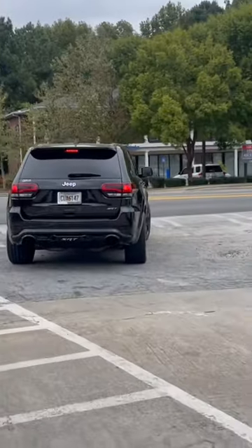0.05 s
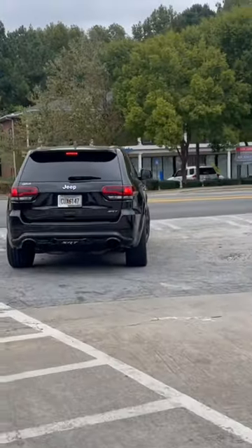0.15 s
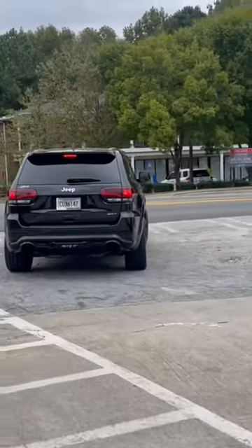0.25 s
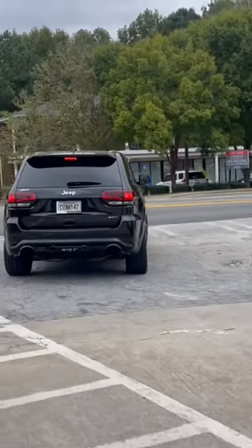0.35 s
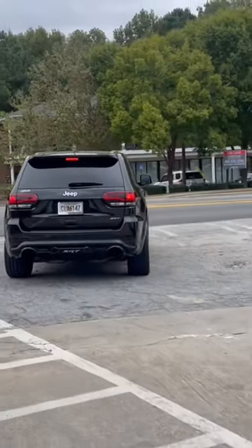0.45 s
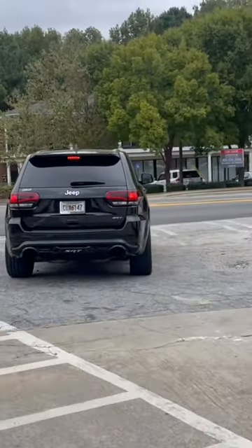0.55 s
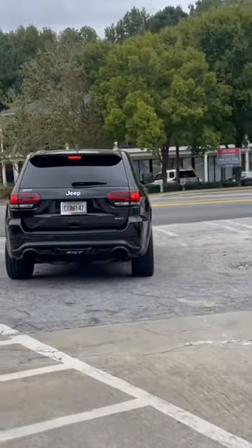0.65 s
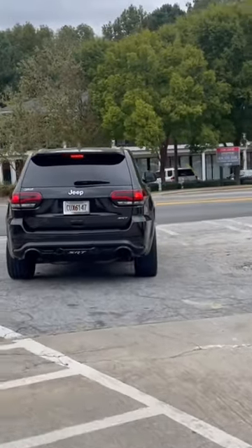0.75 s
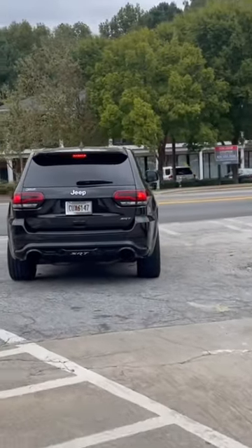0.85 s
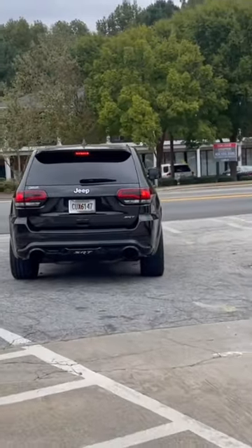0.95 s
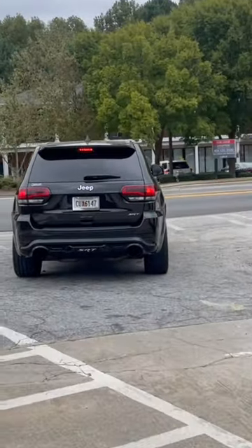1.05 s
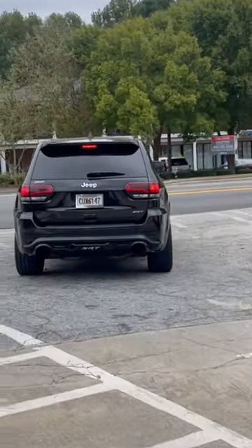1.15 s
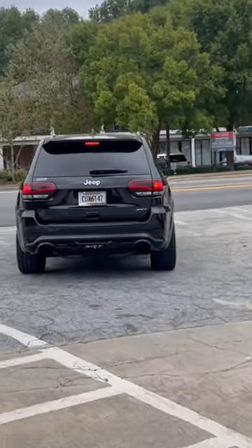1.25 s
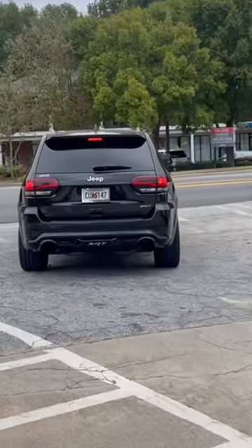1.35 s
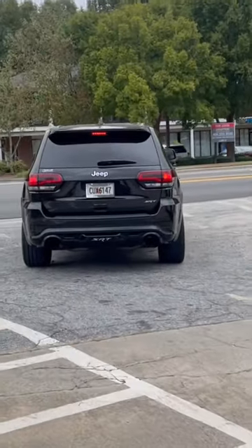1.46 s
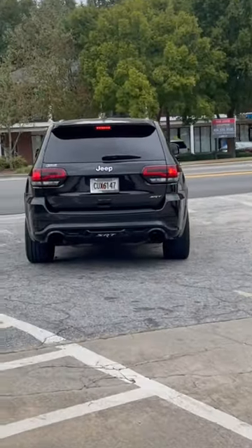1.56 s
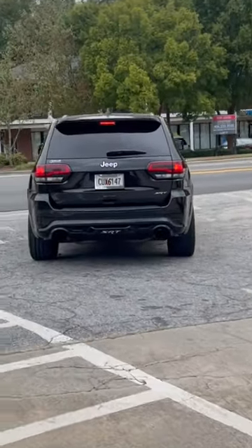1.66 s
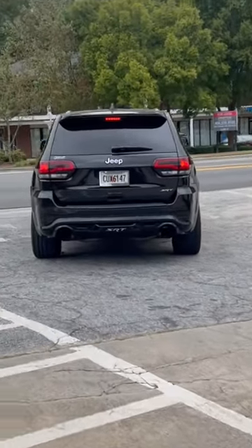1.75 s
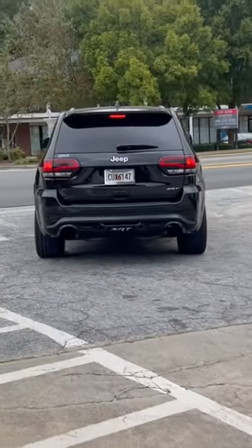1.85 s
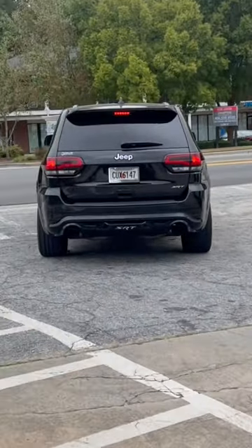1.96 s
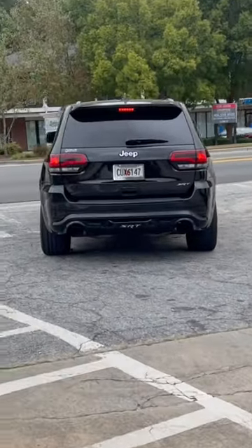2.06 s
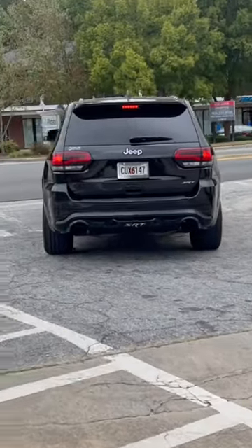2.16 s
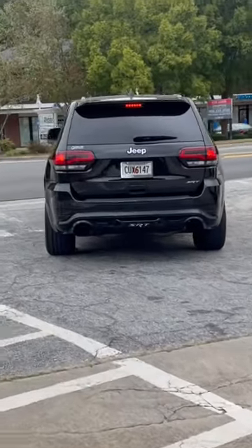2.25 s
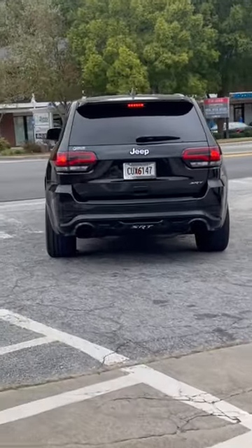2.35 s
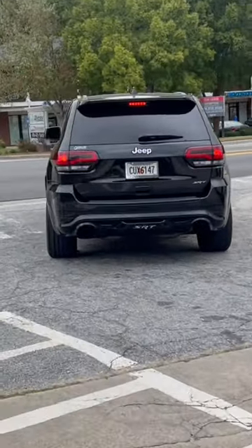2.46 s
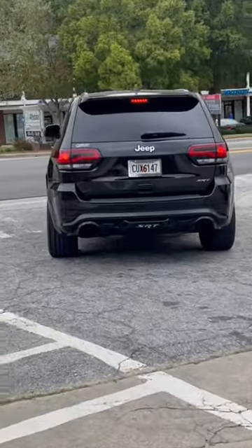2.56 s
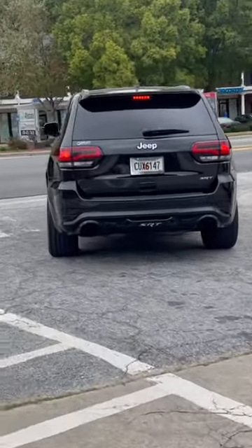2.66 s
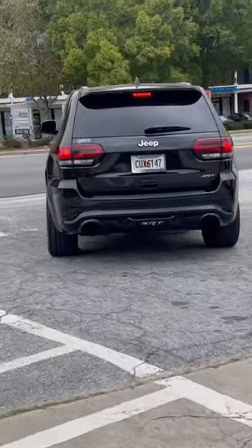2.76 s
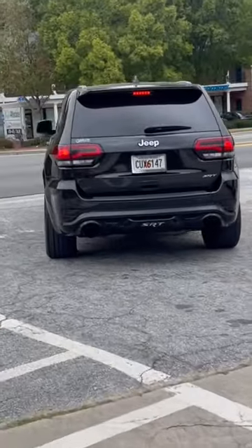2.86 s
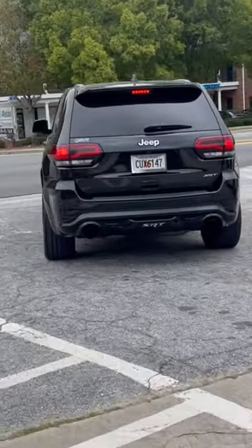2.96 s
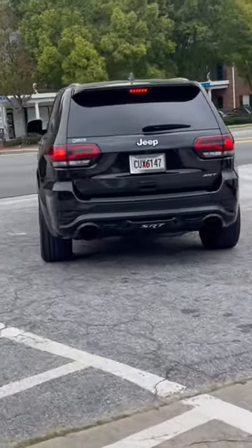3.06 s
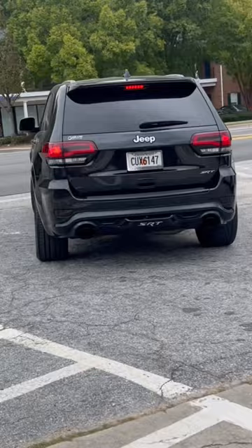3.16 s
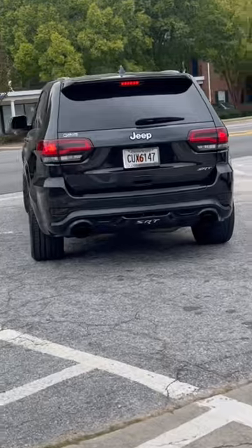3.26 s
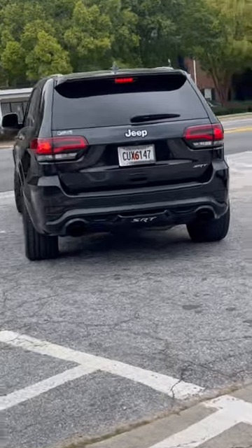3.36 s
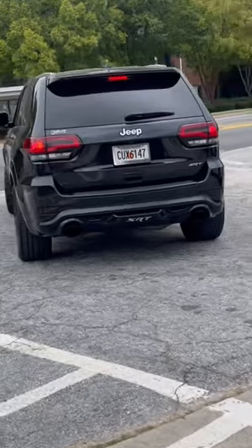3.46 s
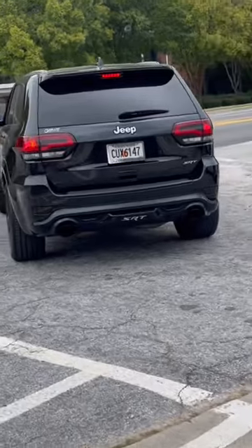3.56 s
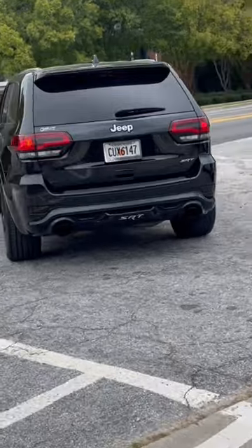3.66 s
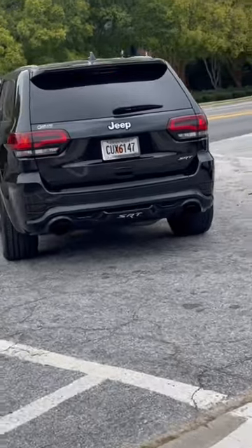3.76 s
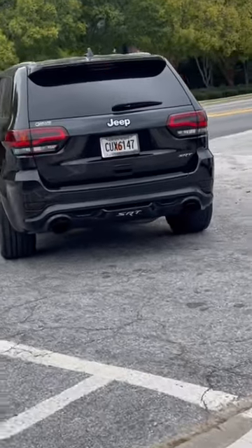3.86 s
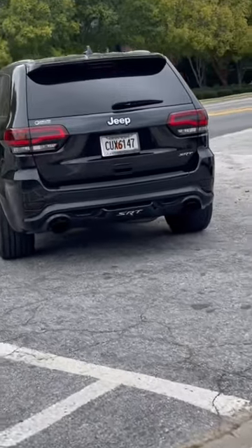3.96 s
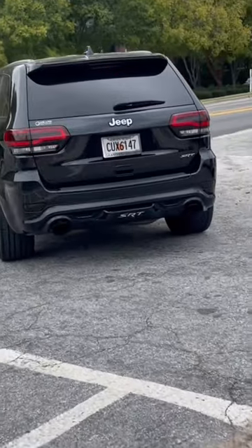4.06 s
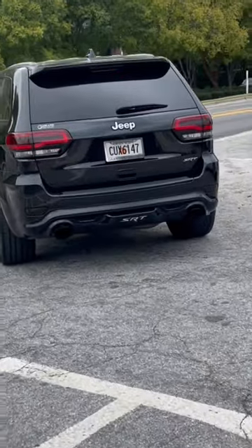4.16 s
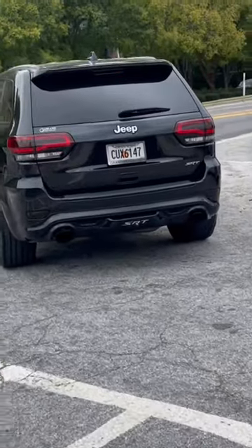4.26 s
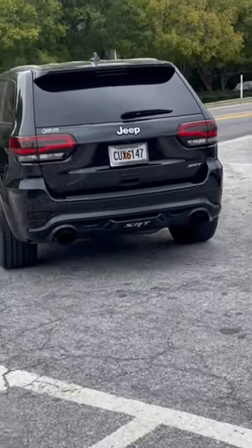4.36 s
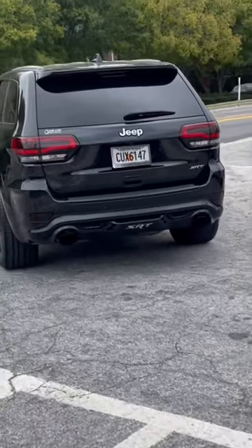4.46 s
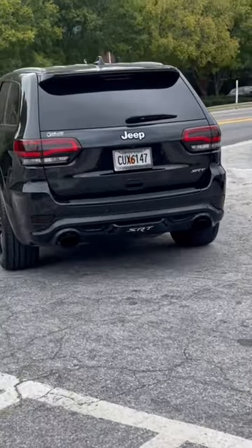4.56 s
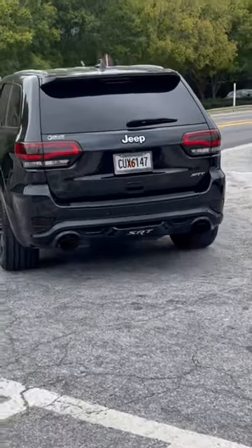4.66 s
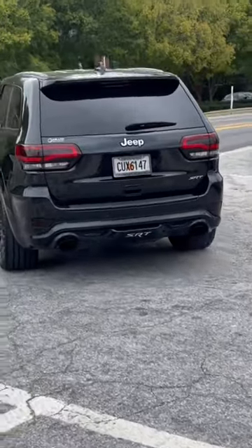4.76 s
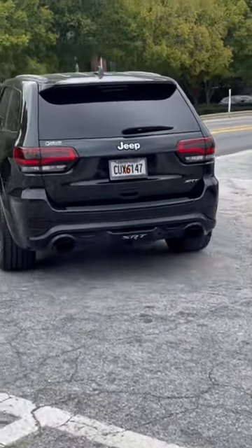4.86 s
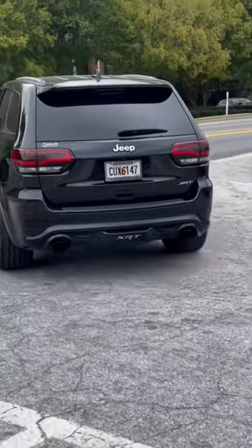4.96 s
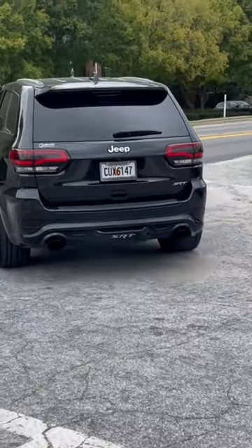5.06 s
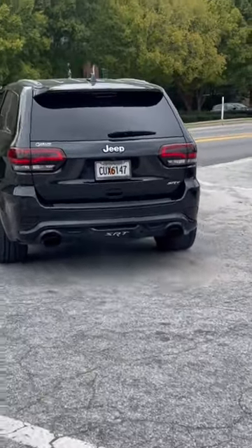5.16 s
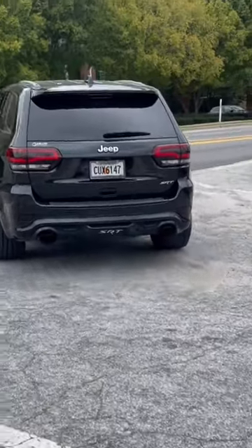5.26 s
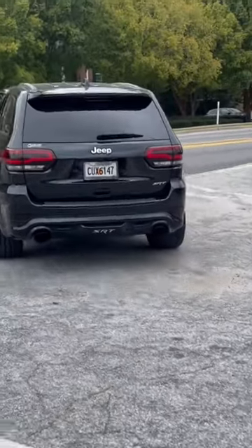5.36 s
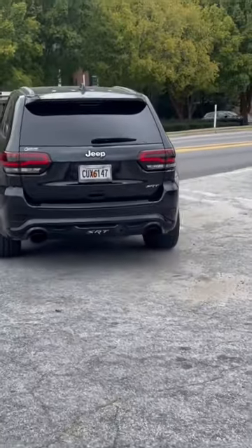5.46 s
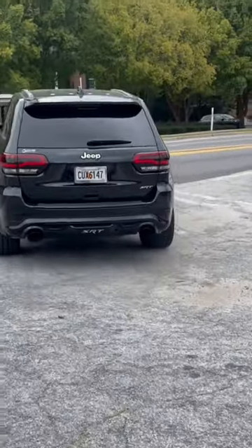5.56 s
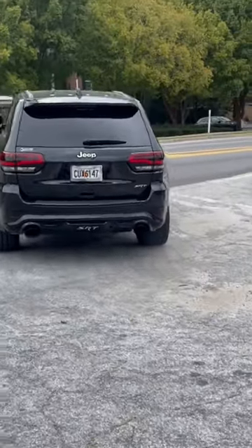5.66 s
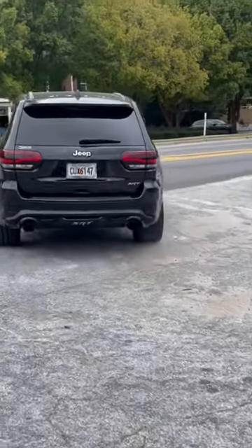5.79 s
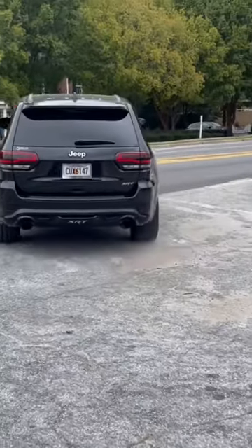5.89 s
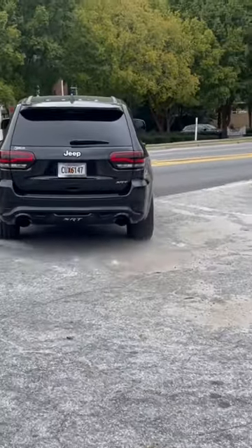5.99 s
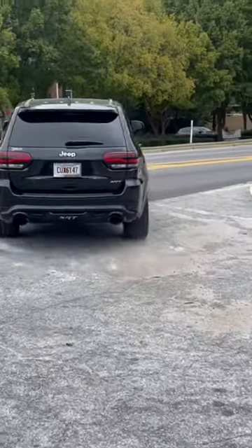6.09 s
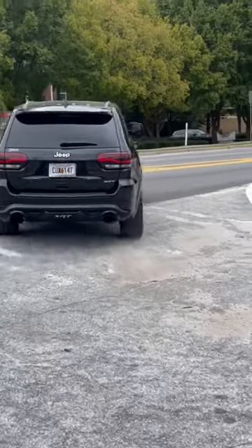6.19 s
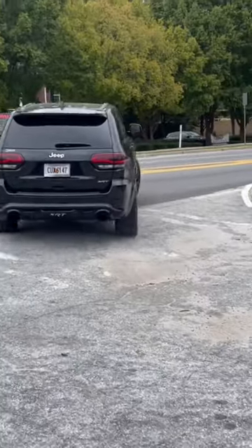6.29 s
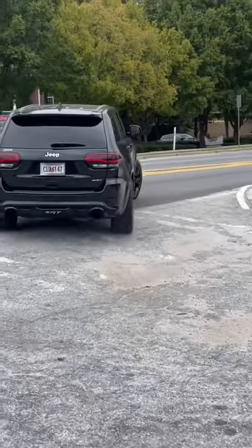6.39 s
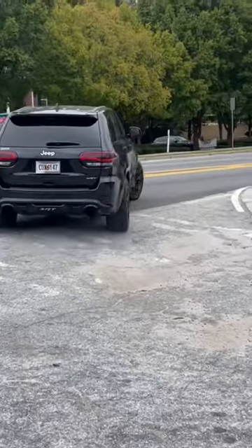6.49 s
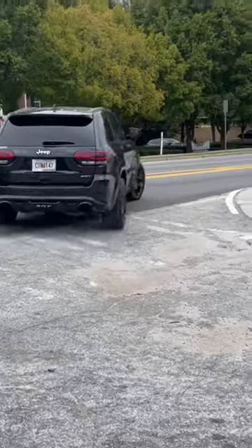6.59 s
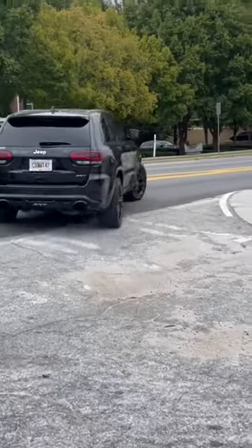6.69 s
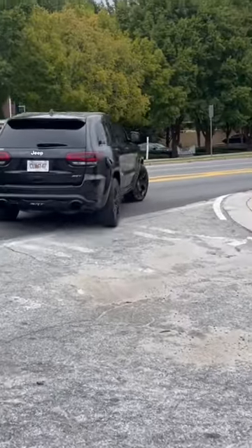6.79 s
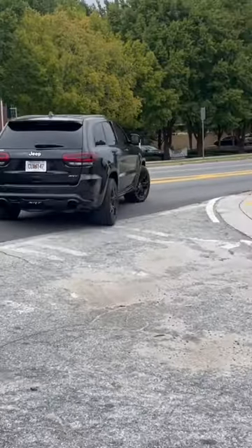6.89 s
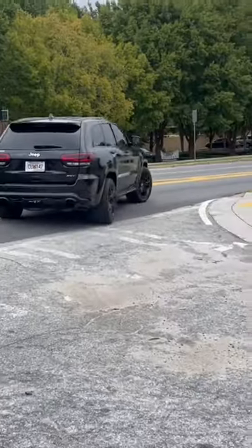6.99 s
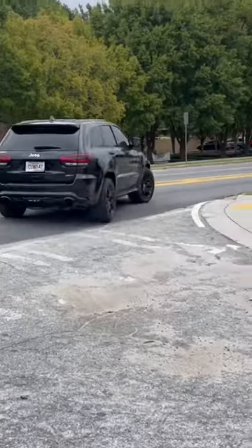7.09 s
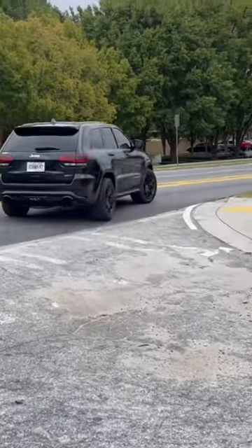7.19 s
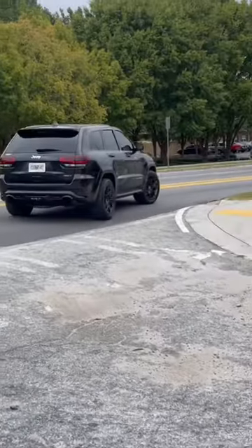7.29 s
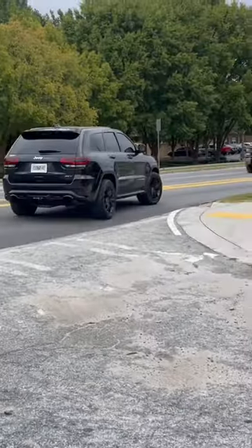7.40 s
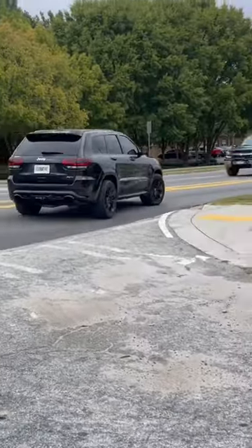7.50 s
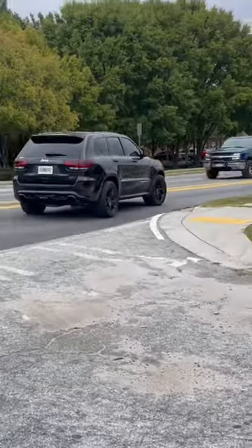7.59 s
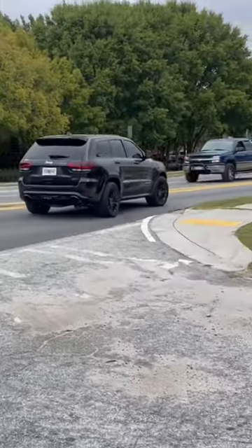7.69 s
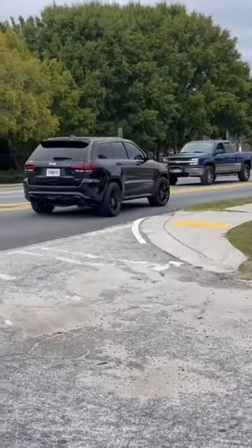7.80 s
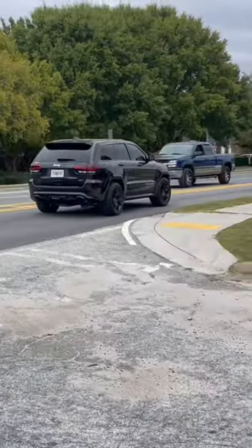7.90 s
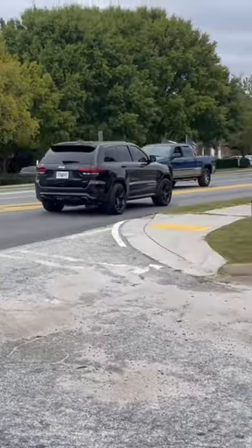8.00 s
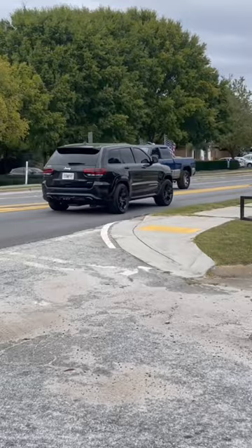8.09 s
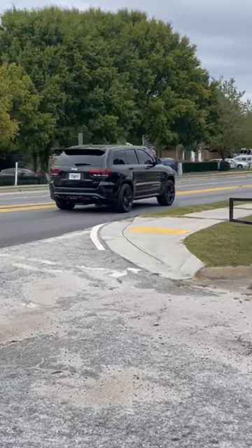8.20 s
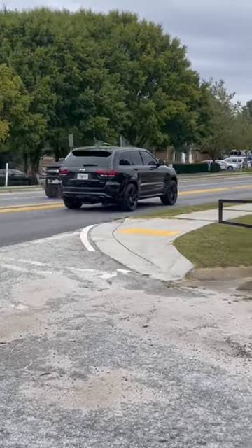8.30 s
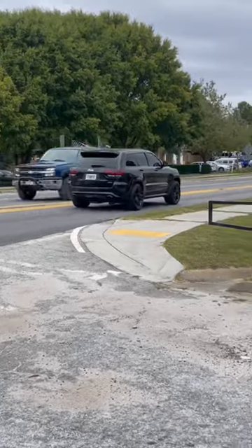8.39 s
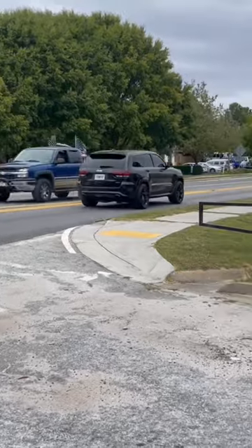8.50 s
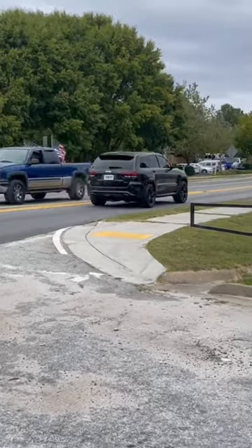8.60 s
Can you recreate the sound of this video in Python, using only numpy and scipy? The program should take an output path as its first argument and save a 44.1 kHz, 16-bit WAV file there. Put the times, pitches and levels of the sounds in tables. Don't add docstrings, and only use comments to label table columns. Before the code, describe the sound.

From 0 to 4 s a big V8 idles steadily close by, deep and loping, each firing a soft thump with a puff of breathy hiss; far traffic hums and rumbles behind. Dull knocks on the hand-held phone come at 0.2 s, in a cluster from 1.5 to 2.3 s, and around 3.1, 3.6 and 4.0 s; the bass thins after the hardest. At about 4.2 s the revs jump, and a loud barking, raspy roar holds from 4.4 to 5.0 s. It eases to a quieter low drone by 5.6 s, with two small stone snaps at 5.3 and 5.4 s. From 6 s throttle builds again, strong at 6.9 s, dipping slightly at 7.3 s, then pitch climbs steeply from 7.7 s to the cut at 8.6 s, snarling with bright hiss and rapid sharp cracks. Short close tarmac echo, open air, stereo.

```python
import sys
import numpy as np
from scipy import signal
from scipy.fft import rfft, irfft, next_fast_len
from scipy.io import wavfile
from scipy.ndimage import uniform_filter1d

SR = 44100
rng = np.random.default_rng(int(sys.argv[2]) if len(sys.argv) > 2 else 0)


def transcribe(u):
    v = np.clip(np.atleast_2d(u).T, -1, 1)
    q = np.round(v * 32767).astype(np.int16)
    wavfile.write(sys.argv[1], SR, q)


def voltage_ratio(decibels):
    exponent = np.asarray(decibels, float) / 20
    return 10 ** exponent


N = 381021


def rms_one(x):
    return x / np.sqrt(np.mean(x ** 2) + 1e-20)


def evened(x):
    window = int(.34 * SR)
    power = uniform_filter1d(uniform_filter1d(x ** 2, window), window // 2)
    return x / np.sqrt(power + 1e-12)


def in_time(rows):
    s, *columns = np.transpose(rows)
    return [np.interp(np.arange(N) / SR, s, column) for column in columns]


def at_speed(points, firing_hz):
    return np.interp(firing_hz, *np.transpose(points))


def bins(size):
    return np.arange(size // 2 + 1) * SR / size + 1e-3


def at_hz(points, hz):
    point_hz, level_db = np.transpose(points)
    return np.interp(np.log(hz), np.log(point_hz), level_db)


def coloured(spectrum, channels=1):
    size = next_fast_len(N)
    white = rfft(rng.standard_normal((channels, size)))
    return rms_one(irfft(white * voltage_ratio(at_hz(spectrum, bins(size))), size)[:, :N])


def resonate(x, modes):
    out = 0
    for k, (hz, width_hz, level_db) in enumerate(modes):
        r = np.exp(-np.pi * width_hz / SR)
        a = [1, -2 * r * np.cos(2 * np.pi * hz / SR), r * r]
        b = (1 - r * r) / 2 * np.array([1, 0, -1])
        out = out + (-1) ** k * voltage_ratio(level_db) * signal.lfilter(b, a, x)
    return out


def dying(clicks, decay_ms):
    return signal.lfilter([1], [1, -np.exp(-1000 / (decay_ms * SR))], clicks + 1e-18)


# (frequency [Hz], level [dB per Hz])
STREET_HUM = [(350, 3), (817, 3), (1100, -10), (1910, -11.5), (8950, -25), (10200, -91), (10600, -70),
              (13000, -76)]
# (frequency [Hz], level [dB per Hz])
LOW_RUMBLE = [(20, -11.5), (45, -2.5), (80, 11.5), (160, -1), (300, -45)]
STREET_DB, RUMBLE_DB = -38, -30
STREET_WIDE_HZ = 650
RUMBLE_APART = 0.38


def street():
    mid, side = coloured(STREET_HUM, channels=2)
    low_mid, low_side = coloured(LOW_RUMBLE, channels=2)
    side = signal.sosfilt(signal.butter(2, STREET_WIDE_HZ, "high", fs=SR, output="sos"), side)
    sides = np.array([[1], [-1]])
    hum = voltage_ratio(STREET_DB - 2.5) * (mid + sides * side)
    return hum + voltage_ratio(RUMBLE_DB) * (low_mid + RUMBLE_APART * sides * low_side)


# (time [s], peak level [dB], pitch [Hz], time to fall 60 dB [s], brightness [dB])
PHONE_KNOCKS = [(0.16, -12.5, 82, 0.13, -21), (1.458, 5.5, 85, 0.021, -21), (1.499, -27, 95, 0.069, 0),
                (1.553, -10.5, 86, 0.12, -25), (1.603, -8.5, 105, 0.18, -20), (1.638, -14, 136, 0.088, -17),
                (1.671, -10.5, 182, 0.14, -23), (1.718, -21, 335, 0.15, -13), (1.777, -4, 206, 0.037, -15),
                (1.879, -3, 95, 0.07, -25), (1.926, 11, 345, 0.021, -14), (1.945, 15.5, 65, 0.022, -20),
                (2.297, -2.5, 92, 0.046, -15), (2.34, -17, 171, 0.084, -6), (3.087, -16.5, 97, 0.065, -1.5),
                (3.649, -9.5, 100, 0.099, -33), (4.015, -7, 300, 0.095, -6.5),
                (4.044, -1.5, 338, 0.031, 0.5), (4.074, -19, 385, 0.048, 3.5),
                (1.58, -17.5, 246, 0.14, -12)]


def knocks():
    out, t = np.zeros(N), np.arange(int(.2 * SR)) / SR
    body = signal.butter(3, [120, 650], "band", fs=SR, output="sos")
    for s, peak_db, hz, t60_s, bright_db in PHONE_KNOCKS:
        swell = (1 - np.exp(-t / .006)) ** 2
        shape = voltage_ratio(-60 * t / max(t60_s, .02)) * swell
        rattle = rms_one(signal.sosfilt(body, rng.standard_normal(len(t))))
        blow = np.sin(2 * np.pi * hz * t) + voltage_ratio(bright_db) * rattle
        i = int(s * SR)
        out[i:i + len(t)] += voltage_ratio(peak_db + 7.5) * shape * blow
    return out


# (time [s], peak level [dB], pitch [Hz])
STONES = [
    (5.262, -19, 2070),
    (5.42, -26, 1750),
]


def grit():
    out = 0
    for s, peak_db, hz in STONES:
        click = np.zeros(N)
        click[int(s * SR)] = voltage_ratio(peak_db + 24)
        out = out + resonate(click + 1e-18, [(hz, 0.13 * hz, 0.1)])
    return out


# (time [s], delay [ms])
GROUND_DELAY = [(0, 0.28), (1.5, 0.27), (2.5, .44), (4, 0.54), (5, 0.47), (6, 0.53), (7, 0.45), (7.8, 0.3),
                (8.64, 0.37)]


def tarmac(x, share):
    late = np.arange(N) - in_time(GROUND_DELAY)[0] * SR / 1000
    bounce = signal.lfilter([.6], [1, -.4], np.interp(late, np.arange(N), x))
    return x + share * bounce


# (time [s], full four-stroke cycles per second [Hz])
CRANK_SPEED = [(0, 5.85), (4.13, 5.85), (4.29, 6.5), (4.5, 11.7), (4.62, 13.4), (4.8, 14.5), (5.04, 14.55),
               (5.3, 12.2), (5.45, 11.94), (5.9, 12.14), (6.35, 14.3), (6.65, 14.15), (6.95, 16.3),
               (7.27, 17.75), (7.7, 21.45), (7.85, 24.89), (8.15, 30.3), (8.64, 42.1)]
# (time [s], width [s], share of speed [-])
IDLE_HUNT = [
    (1.6, .45, -.028),
    (2.5, .3, .02),
]
FLYWHEEL_S = .06


def crank_speed():
    t = np.arange(N) / SR
    cycles_hz = uniform_filter1d(in_time(CRANK_SPEED)[0], int(FLYWHEEL_S * SR))
    return cycles_hz * (1 + sum(part * np.exp(-((t - s) / width) ** 2) for s, width, part in IDLE_HUNT))


# (time [s], pulse strength [dB], gas flow [dB])
THROTTLE = [(0, -34, -43.5), (1.45, -31.5, -40.5), (1.7, -29.5, -41.5), (3.45, -39, -40.5),
            (4.18, -31, -38.5), (4.38, -19, -19), (4.9, -15.5, -20.5), (5.05, -18.5, -30),
            (5.25, -27, -47.5), (5.62, -34, -57), (5.9, -27.5, -40.5), (6.13, -23, -41.5),
            (6.3, -20.5, -33), (6.9, -15, -24.5), (7.34, -18, -29.5), (7.8, -13.5, -24.5), (7.95, -20, -30),
            (8.64, -27.5, -32.5)]
FLOW_IDLE_DB = -38.5


def throttle():
    return in_time(THROTTLE)


# (pressure excess [share], puff level [dB], crack level [dB], path delay [ms])
FIRING_ORDER = [(1.5, -3.5, -1.5, 2.1), (-1.1, -2.5, -16, .8), (-1.5, 2.5, -12, 1.1), (.9, 1.5, -17, .6),
                (-.6, -3.5, .5, .15), (1.1, .5, -8, 1.5), (.6, 1.5, -9, -.3), (-.9, 2.5, -17, .2)]
IDLE_PRESSURE = [-0.4, 0.45, -0.79, 0.026, 0.18, -0.017, -.9, -1.14]
LOPE_UNTIL_HZ = 71.6
UNEVEN = 0.63
HEADER_HZ = [140, 580]


def firings(fired, firing_hz):
    at = np.flatnonzero(np.diff(np.floor(fired)) > 0)
    cylinder = np.floor(fired[at + 1]).astype(int) % 8
    excess, puff_db, crack_db, lag_ms = np.array(FIRING_ORDER)[cylinder].T
    idling = np.tanh((LOPE_UNTIL_HZ - firing_hz[at]) / 10)
    excess = np.where(idling > 0, np.array(IDLE_PRESSURE)[cylinder], excess)
    chance = rng.standard_normal((5, len(at)))
    lone, pressure, puffs, spits, cracks = np.zeros((5, N))
    lone[at[cylinder == 6]] = 1
    lone = signal.sosfilt(signal.butter(3, HEADER_HZ, "band", fs=SR, output="sos"), lone + 1e-18)
    piped = at + (.6 * idling * lag_ms * SR / 1000).astype(int)
    burn = 1 - UNEVEN + UNEVEN * excess + (.2 + .06 * idling) * chance[0]
    pressure[np.clip(piped, 0, N - 1)] = burn
    puffs[at] = voltage_ratio(puff_db + (2.6 + .8 * idling) * chance[1])
    spits[at] = voltage_ratio(puff_db + 2.5 * chance[2])
    late = at + ((lag_ms + .15 * chance[3]) * SR / 1000).astype(int)
    cracks[np.clip(late, 0, N - 1)] = voltage_ratio(crack_db + 1.1 * chance[4])
    return lone, pressure, puffs, spits, cracks


# (frequency [Hz], width [Hz], level [dB])
LONE_MODES = [(186.5, 20.3, 5), (303, 22, -4.5), (345, 18, -9), (400, 36, -3), (713, 280, -12.5)]
# (firing rate [Hz], level [dB])
LONE_LEVEL = [(50, -22.5), (95, -10), (110, -5.5), (135, 0.5), (160, 5.5), (200, -3.5), (300, -16)]


def lone_cylinder(lone, firing_hz, pulse_db):
    return voltage_ratio(pulse_db + at_speed(LONE_LEVEL, firing_hz)) * evened(resonate(lone, LONE_MODES))


# (firing rate [Hz], boom [dB], firing tone [dB], its octave [dB], bank beat [dB])
SILENCER_LEVELS = [(46.4, 11, 2, 6.5, -38), (51, 10, 11, 12.5, -31), (101, 11, 7, 3, -38),
                   (114, 8.5, 12, -9, -5.5), (142, 1.5, -12, -29, -12), (169, 2.5, 3, -23, -56),
                   (199, -3.5, -14.5, -2.5, -3), (317, -25, -12, -53, -0.5)]
# (frequency [Hz], width [Hz], level [dB])
SILENCER_MODES = [(59, 10, 2), (91.8, 35, -5), (108.3, 12.4, 5), (150, 6.1, 2.5), (179.6, 10.7, -2.5),
                  (237.2, 34, -6.5)]
# (multiple of the cycle rate [-], level [dB])
BANK_BEAT = [(3, -15), (4, -9), (5, 0)]


def silencer(pressure, turbulence, fired, firing_hz, pulse_db):
    rates_hz, *passed = np.transpose(SILENCER_LEVELS)
    levels = [pulse_db + np.interp(firing_hz, rates_hz, db) for db in passed]
    boom_db, tone_db, octave_db, beat_db = levels
    tone = voltage_ratio(tone_db) * np.sin(2 * np.pi * fired) + voltage_ratio(octave_db) * np.sin(4 * np.pi * fired)
    beat = 0
    for k, db in BANK_BEAT:
        beat = beat + voltage_ratio(db) * np.sqrt(2) * np.sin(2 * np.pi * k * fired / 8 + k)
    boom = resonate(pressure + .007 * turbulence, [(120, 200, 0.1)])
    boom = evened(resonate(boom, SILENCER_MODES))
    boom_power = voltage_ratio(2 * boom_db)
    rest = np.sqrt(np.maximum(boom_power - voltage_ratio(2 * tone_db), 0.21 * boom_power))
    return 1.14 * tone + voltage_ratio(beat_db) * beat + 0.87 * rest * boom


# (frequency [Hz], width [Hz], level [dB])
TAIL_PIPE_MODES = [(294, 13.7, 2), (338.9, 17.8, 5), (418, 38, 1.1), (480, 10.4, 4.5), (521.8, 30, -4.5),
                   (697, 44, -21), (822, 18, -17), (876, 163, -15.5)]
# (frequency [Hz], width [Hz], level [dB])
SNARL_MODES = [(660, 277, 17), (930, 420, -8.5), (1250, 660, -4.5), (1617, 350, 10)]
# (firing rate [Hz], level [dB])
FRONT_STEEPNESS = [(145, 7.2), (190, 12.5), (300, 21.5)]
SNARL_DB, SNARL_FOLLOWS = -21, 0.55


def tail_pipes(pressure, turbulence, firing_hz, pulse_db, hiss_rise_db):
    snarl_db = SNARL_DB + SNARL_FOLLOWS * hiss_rise_db + at_speed(FRONT_STEEPNESS, firing_hz)
    breathy = .005 + .03 * (firing_hz / 8 < 6.2)
    bark = evened(resonate(pressure + breathy * turbulence, TAIL_PIPE_MODES))
    snarl = evened(resonate(pressure + .02 * turbulence, SNARL_MODES))
    return voltage_ratio(pulse_db) * (bark + voltage_ratio(snarl_db) * snarl)


# (frequency [Hz], level [dB per Hz])
RASP_SPECTRUM = [(800, -28), (1200, 6.5), (1800, 3), (2800, 3.5), (3800, -3.5), (5000, -20.5), (6500, -90)]


def rasp(breath, flow_db):
    noise = evened(coloured(RASP_SPECTRUM)[0] * (breath + 0.12))
    return voltage_ratio(flow_db - 5.5) * tarmac(noise, share=0.7)


# (time [s], gain of the top hiss [dB])
TOP_HISS_GAIN = [(0, -4), (2, -0.1), (6.25, -3.7), (6.4, -7), (7.77, -8), (7.83, 12.5), (8.2, 16), (8.64, 19.5)]
HISS_IDLE_DB, HISS_FOLLOWS = -50, 0.7


def top_hiss_level(flow_db):
    gain_db = in_time(TOP_HISS_GAIN)[0]
    hiss_db = HISS_IDLE_DB + HISS_FOLLOWS * (flow_db - FLOW_IDLE_DB) + gain_db
    return hiss_db, hiss_db - np.maximum(gain_db, 0) - HISS_IDLE_DB


# (frequency [Hz], level [dB per Hz])
HISS_SPECTRUM = [(2000, -34), (4000, -19), (5000, -6.5), (7000, -8.5), (9500, -1), (10200, -5.5),
                 (12000, -17.5), (12500, -70)]
# (frequency [Hz], level [dB per Hz])
CRACK_SPECTRUM = [(1500, -87), (3100, 1.7), (7000, -10), (8800, -2), (10200, -2), (12000, -22),
                  (14000, -45), (16500, -44)]
SHOCK_FROM_DB, SHOCK_SPAN_DB = -54.5, 18.5


def hiss_and_cracks(spits, cracks, hiss_db):
    shock = np.clip((hiss_db - SHOCK_FROM_DB) / SHOCK_SPAN_DB, 0, 1)
    hiss = evened(coloured(HISS_SPECTRUM)[0] * (dying(spits, decay_ms=9.8) + 0.33))
    crack = evened(coloured(CRACK_SPECTRUM)[0] * dying(cracks, decay_ms=1))
    fizz = np.sqrt(1 - shock) * hiss + np.sqrt(shock) * crack
    return voltage_ratio(hiss_db + 5.0) * tarmac(fizz, share=0.3)


def engine():
    firing_hz = 8 * crank_speed()
    fired = .55 + np.cumsum(firing_hz) / SR
    pulse_db, flow_db = throttle()
    hiss_db, hiss_rise_db = top_hiss_level(flow_db)
    lone, pressure, puffs, spits, cracks = firings(fired, firing_hz)
    breath = dying(dying(puffs, decay_ms=3), decay_ms=1.4) / 50
    turbulence = rng.standard_normal(N) * (breath + .3)
    low = lone_cylinder(lone, firing_hz, pulse_db)
    low = low + silencer(pressure, turbulence, fired, firing_hz, pulse_db)
    low = low + tail_pipes(pressure, turbulence, firing_hz, pulse_db, hiss_rise_db)
    return low + rasp(breath, flow_db) + hiss_and_cracks(spits, cracks, hiss_db)


# (frequency [Hz], phase [radians])
LEFT_PHASE = [(400, .14), (1380, 1.8), (1720, 5.6), (2760, 7.1), (7580, 7.2), (8870, 5.6), (11600, 0.1),
              (14800, -6.2)]
# (frequency [Hz], level [dB])
LEFT_LEVEL = [(60, 1.0), (200, 0.7), (700, 0.0), (1290, 1.0), (2800, 1.2), (4600, 4.5), (8120, 0.5),
              (15000, 0.0)]
# (frequency [Hz], level [dB])
ECHO_SPECTRUM = [(300, -28), (700, -14), (1400, -6), (2500, -9), (4800, -3), (8500, -12), (11000, -8)]
ECHO_T60_S = .2


def two_ports(x):
    size = next_fast_len(N + SR)
    hz, t = bins(size), np.arange(SR // 2) / SR
    lead = np.interp(hz, *np.transpose(LEFT_PHASE)) / 2
    side = voltage_ratio(at_hz(LEFT_LEVEL, hz) / 2) * np.exp(1j * lead)
    scatter = rng.standard_normal((2, len(t))) * voltage_ratio(-60 * t / ECHO_T60_S) * (t > .004)
    scatter = scatter / np.sqrt(np.sum(scatter ** 2) / 2)
    echoes = rfft(scatter, size) * voltage_ratio(at_hz(ECHO_SPECTRUM, hz))
    return irfft(rfft(x, size) * (np.array([side, 1 / side]) + echoes), size)[:, :N]


DUCK = 0.25


def scene():
    flow_db = throttle()[1]
    duck_db = -DUCK * np.maximum(flow_db - FLOW_IDLE_DB, 0)
    return voltage_ratio(duck_db) * street() + two_ports(knocks() + grit() + engine())


# (start [s], end [s], bass cut [dB])
BASS_CUTS = [
    (1.956, 3.595, -9),
    (1.97, 2.253, -27),
    (3.173, 3.497, -7),
    (4.07, 4.262, -12),
]
GUARD_HZ, GUARD_RAMP_S, GUARD_RELEASE_S = 400, 0.018, 0.36


def wind_guard(x):
    t = np.arange(N) / SR
    cut_db = 0
    for start, end, db in BASS_CUTS:
        ramp = np.minimum((t - start) / GUARD_RAMP_S, (end - t) / GUARD_RELEASE_S)
        cut_db = cut_db + db * np.clip(ramp, 0, 1)
    bass = signal.lfilter(*signal.butter(1, GUARD_HZ, fs=SR), x)
    return x - (1 - voltage_ratio(cut_db)) * bass


def low_pass(x):
    return signal.sosfilt(signal.butter(12, 16670, fs=SR, output="sos"), x)


def record(dry):
    mix = signal.sosfilt(signal.butter(4, 45, "high", fs=SR, output="sos"), wind_guard(dry))
    mix = 1.07 * np.tanh(mix)
    mix = signal.sosfilt(signal.butter(3, 12000, fs=SR, output="sos"), mix)
    return low_pass(mix)


dry = scene()
out = record(dry)
transcribe(out)
```